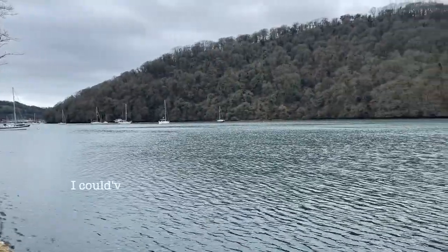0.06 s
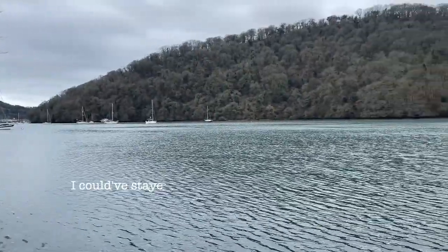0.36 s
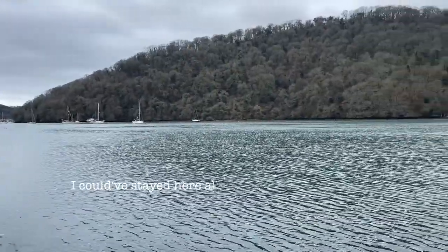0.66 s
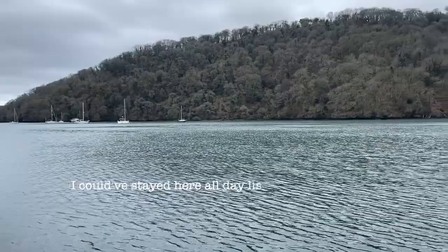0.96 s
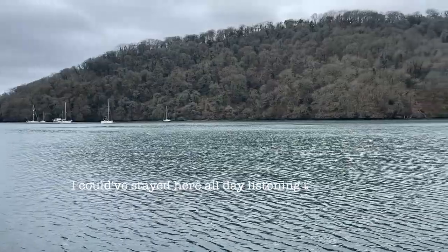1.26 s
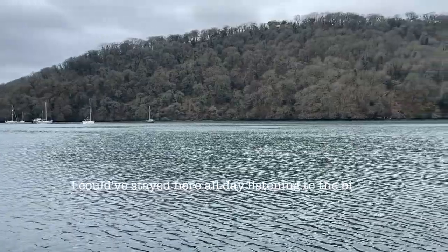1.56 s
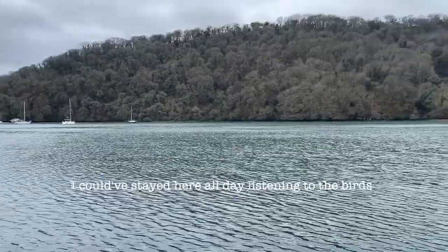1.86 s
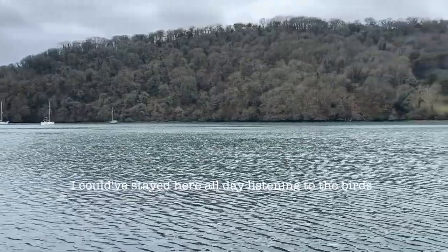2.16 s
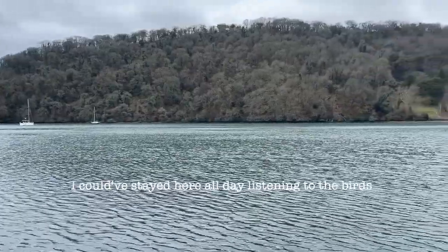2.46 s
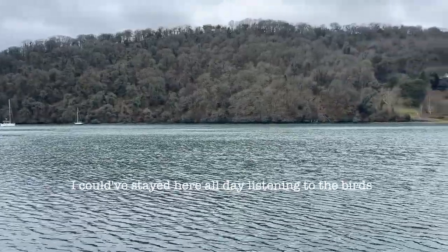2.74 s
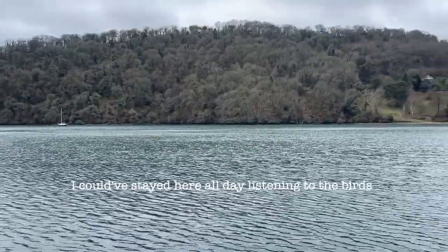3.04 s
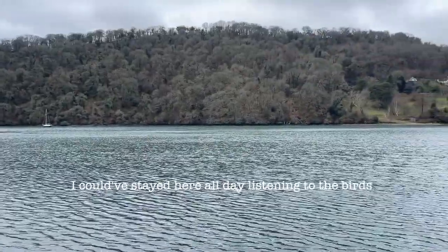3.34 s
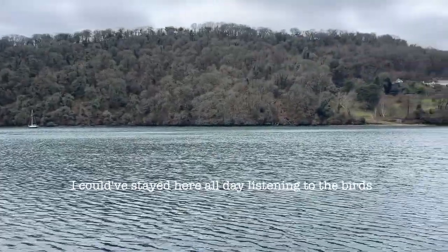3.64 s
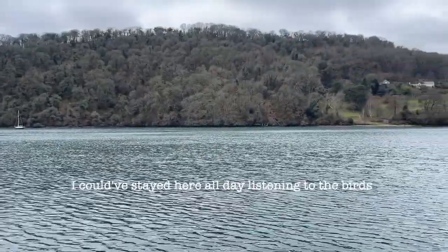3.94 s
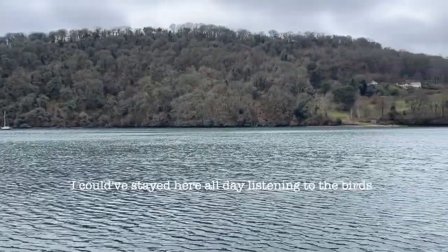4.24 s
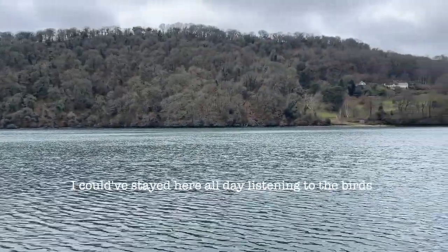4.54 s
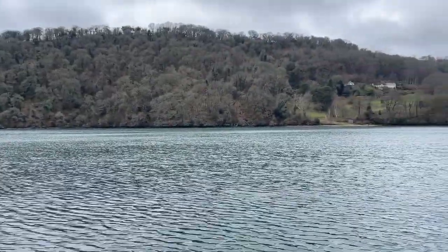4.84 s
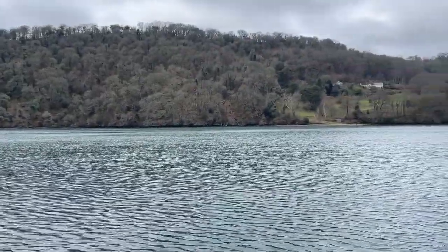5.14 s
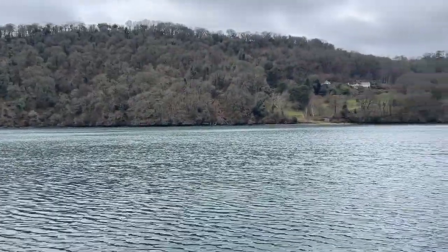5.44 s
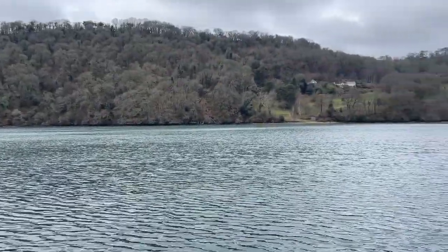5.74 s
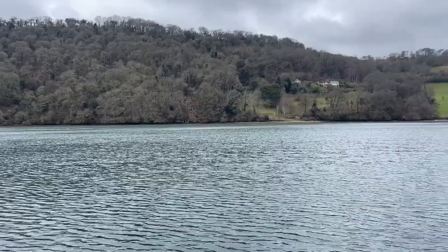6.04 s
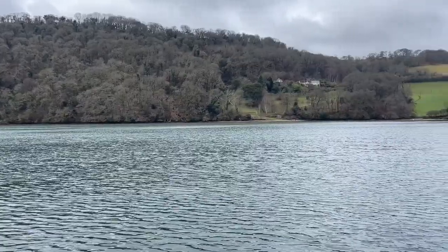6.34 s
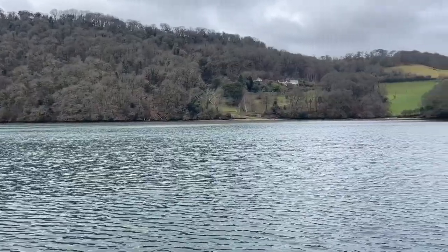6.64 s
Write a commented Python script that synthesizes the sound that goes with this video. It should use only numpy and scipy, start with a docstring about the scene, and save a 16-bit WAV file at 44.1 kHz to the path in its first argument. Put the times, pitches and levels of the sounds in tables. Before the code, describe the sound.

Outdoors on a wooded riverbank, low wind rumbles and softly thumps on the microphone over a faint hiss. From the start, a bird on the left gives a harsh trill that slows and ends in two falling notes at about 1.5 seconds. A quick warble follows around 2 seconds, then clear whistles with a quavering tail from 2.5 to 2.9. A thin, very high call runs from 3.6 to 4.6 seconds, slightly right, followed by one longer note on the left until about 5. Faint distant chirps come in between. Small ripples plop at the shore throughout, most clearly in the first second, with occasional soft washes over stones. A few faint scuffs sound nearby between 1.6 and 4.7 seconds. From about 5.7 seconds a gust brings louder rumbling and buffeting, peaking just after 6, with a faint rustle of dry leaves and tiny clicks.

```python
"""A harsh bird trill over a low breeze, on the wooded bank of a calm river. It slows and ends in two
down-slurs; a warble, plain whistles, a thin high call and one long note follow. Each voice is a gliding
tone from the syrinx, scattered by the trees. Ripples plop on the shore as tiny air pockets ring,
wavelets wash the stones and something scuffs nearby. Wind rumbles and thumps on the microphone,
gusting near the end and stirring dry leaves."""
import sys
import numpy as np
from scipy import signal
from scipy.fft import rfft, irfft, next_fast_len
from scipy.io import wavfile
from scipy.ndimage import uniform_filter1d

SR = 44100
rng = np.random.default_rng(int(sys.argv[2]) if len(sys.argv) > 2 else 0)


def digitize_waveform(pressure):
    """Quantize a signal to 16-bit integers and store it at the path in sys.argv[1].

    Rows of a 2-D input are taken as channels; values are limited to [-1, 1].
    """
    field = np.atleast_2d(pressure).T
    bounded = np.clip(field, -1, 1)
    quanta = np.round(bounded * 32767).astype(np.int16)
    wavfile.write(sys.argv[1], SR, quanta)


N = 299615

# slapback off the bank and the nearest trunks: delay_s, gain_db
NEAR_ECHOES = [(0.0134, -6.5), (0.0263, -8)]


def from_db(db):
    """Decibels to gain."""
    return 10 ** (np.asarray(db) / 20)


def rms_one(x):
    """Scale to unit power."""
    return x / np.sqrt(np.mean(x ** 2) + 1e-20)


def in_time(rows):
    """Automation: each column after time_s, read at every sample."""
    times, *columns = np.transpose(rows)
    return [np.interp(np.arange(N) / SR, times, column) for column in columns]


def at_hz(points, hz):
    """Read a curve on a log-frequency axis."""
    freqs, values = np.transpose(points)
    return np.interp(np.log(hz), np.log(freqs), values)


def filtered(x, order, hz, kind):
    """Butterworth filter."""
    return signal.sosfilt(signal.butter(order, hz, kind, fs=SR, output="sos"), x)


def drift(rate):
    """Random modulation of unit power that takes a new value rate times a second."""
    knots = rng.standard_normal(N // 4)
    return rms_one(np.interp(np.arange(N) * rate / SR, np.arange(len(knots)), knots))


def swells(rows):
    """Bell-shaped envelopes from rows of middle_s, length_s, level_db."""
    t = np.arange(N) / SR
    return sum(from_db(db) * np.exp(-np.minimum((2 * (t - s) / length) ** 2, 20))
               for s, length, db in rows)


def noise(colour, flicker_db):
    """Coloured stereo noise of unit power; each half octave has its own flicker and width."""
    # stereo image, narrow in the bass and wide above: freq_hz, left_right_correlation
    likeness = [(30, .7), (120, .8), (250, .6), (500, .05), (1500, .1), (5000, .05), (12000, -.1)]
    out, edges = 0, 22 * 2 ** np.arange(0, 9.6, .5)
    size = next_fast_len(N)
    bins = np.maximum(np.arange(size // 2 + 1) * SR / size, 1)
    white = rng.standard_normal((2, 2, size))
    coloured = irfft(rfft(white) * from_db(at_hz(colour, bins)), size)[..., :N]
    for k, (low, high) in enumerate(zip(edges, edges[1:])):
        if colour[0][0] < high and low < colour[-1][0]:
            mid, side = filtered(coloured[k % 2], 2, [low, high], "band")
            alike = at_hz(likeness, np.sqrt(low * high))
            band = np.sqrt(1 + alike) * mid + np.sqrt(1 - alike) * side * [[1], [-1]]
            out += from_db(flicker_db * drift(18)) * band
    return rms_one(out)


def tone(hz):
    """A sine of unit power that follows a pitch curve."""
    return np.sqrt(2) * np.sin(2 * np.pi * np.cumsum(hz) / SR)


def voice(hz, db, waver, waver_rate):
    """A near-pure bird tone whose pitch wavers by a small share."""
    return from_db(db) * tone(hz * (1 + waver * drift(waver_rate)))


def note(start_s, length_s, fade_s=0.015):
    """A note's own clock, held at both ends, and a gate that fades just outside them."""
    t = np.arange(N) / SR - start_s
    return np.clip(t, 0, length_s), np.clip(1 + np.minimum(t, length_s - t) / fade_s, 0, 1)


def glide(phrase, waver, waver_rate=300, fade_s=0.024):
    """One voice sliding through rows of time_s, pitch_hz, level_db."""
    hz, db = in_time(phrase)
    start, end = phrase[0][0], phrase[-1][0]
    _, gate = note(start, end - start, fade_s)
    return gate * voice(hz, db, waver, waver_rate)


def panned(x, pan_db):
    """Left louder than right by pan_db."""
    return x * from_db(np.array([[pan_db], [-pan_db]]) / 2)


def perched(x, pan_db):
    """A bird to one side is louder there, and reaches that side a little sooner."""
    lead_s = pan_db * 9e-6 * np.array([[.5], [-.5]])
    hz = np.arange(N // 2 + 1) * SR / N
    return panned(irfft(rfft(x) * np.exp(2j * np.pi * hz * lead_s), N), pan_db)


def echoed(x, echoes):
    """A sound plus its distinct reflections."""
    n = np.arange(N)
    return x + sum(from_db(db) * np.interp(n - round(s * SR), n, x, left=0) for s, db in echoes)


def trees(x, wet_db, t60, tail_db, tail_t60=1.43):
    """Trunks throw different small echoes to each side; the hillside adds a faint long tail."""
    t = np.arange(SR) / SR
    trunks = rng.standard_normal((2, SR)) * (rng.random((2, SR)) < 2500 / SR)
    echoes = trunks * (from_db(-60 * t / t60) + from_db(tail_db - 60 * t / tail_t60))
    echoes /= np.sqrt(np.sum(echoes ** 2, axis=1, keepdims=True))
    wet = from_db(wet_db)
    return (x + wet * signal.fftconvolve(x[None], echoes, axes=1)[:, :N]) / np.hypot(1, wet)


def air(level_db=-63):
    """Far woods and water blend into a faint bed of hiss."""
    # EQ of the bed: freq_hz, gain_db
    colour = [(300, 12), (800, 7), (1500, 2), (2500, -4), (4000, -6.5), (5000, -11), (6700, -7),
              (7600, -17.5), (8600, -29.5), (10000, -15.5), (12500, -20.5), (14500, -43)]
    return from_db(level_db) * noise(colour, flicker_db=3)


def wind_rumble(levelling_s=0.082, gustiness_db=0.5):
    """Turbulence on the microphone makes a deep, uneven rumble."""
    # wind strength: time_s, level_db
    strength = [(0, -52), (.33, -57), (1.2, -44), (2.25, -49.5), (2.7, -44.5), (3.25, -42.5), (3.85, -48.5),
                (4.27, -49), (4.9, -44), (5.2, -45.5), (5.58, -49.5), (5.95, -34.5), (6.16, -30),
                (6.35, -38), (6.79, -43)]
    # EQ of the rumble: freq_hz, gain_db
    colour = [(22, -39), (32, -24.5), (43, 1), (65, 1), (85, -1.5), (141, -11.5), (232, -35), (320, -45.5)]
    (wind_db,) = in_time(strength)
    eddies = noise(colour, flicker_db=3)
    eddies /= np.sqrt(uniform_filter1d(np.mean(eddies ** 2, axis=0), int(levelling_s * SR)))
    return from_db(wind_db + gustiness_db * drift(16)) * eddies


def wind_rush():
    """Moving air makes a soft low rush with brief puffs."""
    # ebb and flow: time_s, level_db
    flow = [(0, -57.5), (.8, -49.5), (1.3, -56.5), (1.43, -47), (1.9, -54.5), (2.55, -49), (2.9, -56.5),
            (3.45, -51), (3.7, -59), (3.95, -51), (4.55, -53.5), (5.45, -57), (5.9, -52), (6.79, -55)]
    # puffs of air: middle_s, length_s, level_db
    puffs = [(2.072, 0.091, -53), (2.5, 0.13, -46.5), (4.498, 0.12, -52), (6.05, 0.028, -45),
             (6.293, 0.03, -54), (6.585, 0.057, -50.5)]
    # EQ of the rush: freq_hz, gain_db
    colour = [(90, -13.5), (150, 3.5), (260, -1.5), (400, -11), (600, -21.5), (1000, -47), (2000, -30)]
    (flow_db,) = in_time(flow)
    return np.hypot(from_db(flow_db), swells(puffs)) * noise(colour, flicker_db=3.5)


def leaves():
    """Dry leaves rustle, barely there until the gust stirs them."""
    # rustle envelope: time_s, level_db
    stirring = [(0, -73), (5.6, -100), (5.8, -60), (5.95, -56), (6.08, -69), (6.25, -56), (6.45, -70),
                (6.6, -65.5), (6.79, -59.5)]
    # EQ of the rustle: freq_hz, gain_db
    colour = [(400, 10), (800, 2.5), (1500, 2), (2150, 3.5), (2700, -5), (4200, 1), (5200, -13.5),
              (6800, -7.5), (8500, -23), (12500, -18.5), (14500, -35.5)]
    (rustle_db,) = in_time(stirring)
    return from_db(rustle_db + 2 * drift(60)) * noise(colour, flicker_db=5.5)


def ripples(ring_cycles=4.6, small_per_s=12, small_db=-64):
    """Each plop is a tiny air pocket ringing for a few cycles; smaller ones come at random."""
    # plops on the shore: start_s, peak_db, pitch_hz, pan_db
    plops = [(.119, -50, 1180, 2), (.168, -49, 2700, -4), (.472, -48.5, 1490, -11), (.498, -50, 1130, 0),
             (.574, -52, 1590, -4.5), (.5995, -36, 1670, -8), (.771, -39, 1360, -7), (.865, -45, 1390, -11),
             (1.29, -46, 1887, -9), (2.291, -50, 1090, .5), (2.916, -57, 1300, 1.5),
             (2.929, -51.5, 1390, -2), (3.021, -44.5, 1480, -5), (3.388, -70, 1100, -5),
             (3.443, -50, 855, -4), (4.083, -51, 915, -2.5), (4.1, -49, 1320, -5), (4.202, -47.5, 890, -3),
             (4.887, -51, 650, -7), (5.195, -41.5, 2040, 3), (5.986, -50, 1020, 6),
             (6.182, -48.5, 1720, -16), (6.474, -51.5, 850, -9), (6.698, -64, 1120, -2)]
    out, t = np.zeros((2, N + SR)), np.arange(SR // 20) / SR
    small = [(when * N / SR, small_db + 10 * loudness, 600 * 4 ** height, 0)
             for when, loudness, height in rng.random((int(small_per_s * N / SR), 3))]
    for s, db, hz, pan_db in list(plops) + small:
        cycles = hz * t
        attack = 1 - np.exp(-cycles ** 2 / 2)
        pocket = np.sin(2 * np.pi * cycles) * attack * from_db(-60 * cycles / ring_cycles)
        at = int(s * SR)
        out[:, at:at + len(t)] += panned(from_db(db) * pocket / np.abs(pocket).max(), pan_db)
    return out[:, :N]


def trill(pitch_hz=3998, climb_hz_per_s=300, duty=.51, lift=.19, buzz_hz=430, upper_hz=5200):
    """Both sides of the syrinx sing: the strong one climbs to a buzzing crest, a weak one falls."""
    # harsh notes, slowing as they go: middle_s, relative_db
    notes = [(.148, -48.5), (0.189, -50), (0.234, -49), (0.281, -50), (0.329, -49), (.384, -46.5),
             (0.434, -47.5), (0.495, -48), (0.563, -45.5), (.647, -45), (0.726, -45.5), (.814, -44),
             (.903, -46), (.999, -45), (1.094, -44), (1.192, -42.5), (1.286, -45), (1.379, -44),
             (1.475, -43.5)]
    # grit on each crest: multiple_of_half_pitch, gain_db
    partials = [(1, -9.5), (3, -16.5)]
    middles, levels = np.transpose(notes)
    lengths = duty * np.gradient(middles)
    stray = 1 + .025 * rng.uniform(-0.92, 1, len(middles))
    pitches = (pitch_hz + climb_hz_per_s * (middles - middles[0])) * stray
    t = np.arange(N) / SR
    nearest = np.searchsorted((middles[1:] + middles[:-1]) / 2, t)
    progress = np.clip((t - middles[nearest]) / lengths[nearest], -1, 1)
    crest = swells((s, .03, 0) for s in middles)
    body = swells(zip(middles - lengths / 10, lengths, levels))
    effort = body * (from_db(-5) + from_db(-13) * crest)
    buzz = np.sin(2 * np.pi * np.cumsum(buzz_hz * (1 + 0.168 * drift(150))) / SR)
    rasp = .04 * drift(1200)
    hz = pitches[nearest] * (1 + lift * np.minimum(progress, .35) + .11 * buzz + rasp)
    weak_hz = upper_hz * (1 - 0.082 * progress + 0.021 * buzz + 0.1 * drift(1000))
    # on the crest alternate cycles are unequal, adding odd multiples of half the pitch
    grit = sum(from_db(db) * tone(round(k) * hz / 2 * (1 + 0.049 * drift(800))) for k, db in partials)
    strong = tone(hz) + crest * grit
    weak = from_db(-11) * (tone(weak_hz) + crest * from_db(-5) * tone(weak_hz / 2))
    return filtered(effort * (strong + weak), 16, 6800, "low")


def triller():
    """A bird on the left trills over the water and signs off with two whistled down-slurs."""
    # the trill mirrored by the river: delay_s, gain_db
    water_echo = [(.002315, -11)]
    # the two down-slurs: time_s, pitch_hz, relative_db
    first_slur = [(1.355, 5600, -57), (1.378, 4900, -55), (1.388, 4180, -43.5), (1.415, 3450, -53),
                  (1.445, 3040, -54.5)]
    last_slur = [(1.478, 5180, -69), (1.489, 4070, -48), (1.503, 3270, -47), (1.52, 2570, -56.5)]
    song = echoed(trill(), water_echo)
    slurs = glide(first_slur, waver=0.023, waver_rate=510)
    slurs += glide(last_slur, waver=0.022, waver_rate=910)
    song += from_db(1.5) * echoed(slurs, NEAR_ECHOES)
    return perched(trees(song, wet_db=5, t60=.11, tail_db=-11, tail_t60=.62), pan_db=4.5)


def buffets(unsteady=0.17, spread_rad=0.7, sink=0.303):
    """Each eddy shoves the microphone: a thump that sinks in pitch, its phase different on each side."""
    # wind thumps: middle_s, length_s, pitch_hz, level_db
    thumps = [(0.433, 0.022, 89.7, -36), (0.484, 0.026, 104.7, -35.5), (1.033, .025, 63, -37.5),
              (1.261, 0.046, 79.6, -34.5), (1.617, 0.039, 74.8, -26), (1.675, 0.044, 60, -31),
              (2.076, 0.038, 74, -36), (2.408, 0.027, 62, -26.5), (2.485, 0.022, 80.8, -28.5),
              (2.557, 0.024, 143.6, -38), (2.791, 0.029, 67, -25.5), (2.898, 0.025, 53.7, -23.5),
              (2.967, 0.019, 76, -32.5), (3.082, 0.082, 50.1, -30.5), (4.407, 0.047, 103.5, -34.5),
              (4.5, 0.03, 82.5, -30.5), (4.974, 0.016, 71, -30.5), (5.05, 0.03, 70.8, -30),
              (5.695, 0.015, 67.7, -27.5), (5.746, 0.02, 64.3, -28.5), (5.811, 0.078, 73.14, -28),
              (5.883, 0.022, 71.8, -16), (5.924, 0.0318, 74.2, -21), (5.964, 0.023, 68, -24),
              (6.053, .02, 88.5, -21), (6.144, 0.024, 71.9, -23), (6.204, 0.028, 67.5, -25),
              (6.286, 0.021, 142.3, -23.5), (6.301, .022, 70, -21), (6.373, 0.018, 65, -21.5),
              (6.439, 0.024, 65.5, -22), (6.531, 0.033, 76.3, -30), (6.587, 0.025, 71, -23)]
    out, t = np.zeros((2, N)), np.arange(N) / SR
    churn = 1 + unsteady * drift(120)
    for s, length, hz, db in thumps:
        turn, skew = rng.random(2)
        near = np.abs(t - s) < 2 * length
        age = (t[near] - s) / length
        cycles = np.cumsum(hz * churn[near] * np.exp(-sink * age)) / SR
        phase = 2 * np.pi * (cycles + turn) + spread_rad * (2 * skew - 1) * np.array([[1], [-1]])
        out[:, near] += from_db(db) * np.exp(-(2 * age) ** 2) * np.sin(phase)
    return filtered(out, 2, 32, "high")


def ticks(t60=0.076, trim_db=-6):
    """Tiny dry clicks close to the microphone."""
    # bright noise bursts: start_s, relative_db
    clicks = [(.775, -57), (4.515, -70), (6.208, -54), (6.26, -45.5), (6.30, -56), (6.334, -58)]
    t = np.arange(N) / SR
    decay = sum((t >= s) * from_db(db - 60 * np.clip(t - s, 0, 2 * t60) / t60) for s, db in clicks)
    return from_db(trim_db) * filtered(decay * rng.standard_normal((2, N)), 2, 8000, "high")


def far_calls(arch=0.02, edge_db=2):
    """Short arched glides, blurred by the depth of the wood."""
    # distant birds: start_s, length_s, start_hz, end_hz, level_db
    chips = [(0.84, 0.087, 715, 741, -62), (1.643, 0.12, 3554, 2900, -56), (2.474, 0.029, 2240, 2250, -58),
             (2.613, 0.026, 3007, 2840, -46), (3.177, 0.0082, 3170, 3650, -60),
             (3.237, 0.0058, 3040, 3300, -57), (3.316, 0.024, 2810, 3180, -67.5),
             (3.422, 0.15, 1310, 1371, -69), (3.774, 0.05, 2610, 2620, -64),
             (3.777, 0.015, 1552, 1525, -60), (3.875, 0.057, 1556, 1457, -69),
             (4.092, 0.074, 3545, 3600, -65), (4.257, 0.071, 3370, 3210, -67),
             (4.352, 0.054, 3450, 3445, -63.5), (4.472, 0.064, 3475, 3450, -71.5),
             (5.022, .03, 3740, 3550, -65), (5.066, .12, 3523, 3575, -64), (5.115, 0.097, 3075, 3280, -68),
             (5.39, 0.041, 2560, 2530, -67), (5.67, .02, 4020, 3830, -71),
             (5.692, 0.043, 3000, 2810, -66.5), (5.74, .14, 508, 522, -61.5),
             (5.895, 0.047, 4350, 4420, -86)]
    out = 0
    for s, length, start_hz, end_hz, db in chips:
        middle_hz = (start_hz + end_hz) / 2 * (1 + min(arch, abs(end_hz / start_hz - 1)))
        out += glide([(s, start_hz, db - edge_db), (s + length / 2, middle_hz, db),
                      (s + length, end_hz, db - edge_db)], waver=0.012)
    return trees(out, wet_db=4, t60=0.42, tail_db=-14)


def pips():
    """One small bird repeats a high arched pip from a near branch."""
    # repeats: start_s, level_db
    cues = [(1.531, -66), (1.821, -60.5), (2.3, -64.5), (3.013, -64.5), (5.0, -76)]
    # contour of one pip: offset_s, pitch_hz, gain_db
    shape = [(0, 5880, -8.5), (0.02, 6060, -13.5), (0.038, 5780, 0.5), (.053, 5390, -12)]
    phrases = [[(s + offset, hz, db + gain) for offset, hz, gain in shape] for s, db in cues]
    out = sum(glide(phrase, waver=0.008, fade_s=.008) for phrase in phrases)
    return trees(out, wet_db=-3.5, t60=0.12, tail_db=-41)


def scuffs(attack_s=0.0045):
    """Something brushes the ground nearby: a quick bite, then the friction dies away."""
    # soft strokes: start_s, decay_s, level_db
    strokes = [(1.635, 0.083, -52), (2.193, 0.087, -63), (2.47, 0.098, -61), (3.218, 0.075, -54),
               (4.124, 0.085, -64.5), (4.642, 0.09, -61.5)]
    # EQ of the friction: freq_hz, gain_db
    colour = [(300, 4), (900, -16), (1400, 3.5), (2200, 11.5), (4200, -1.5), (6800, -2.5), (8500, -19.5),
              (13000, -31)]
    push, t = 0, np.arange(N) / SR
    for s, decay_s, db in strokes:
        bite = np.clip((t - s) / attack_s, 0, 1)
        push += bite * swells([(s, 2 * decay_s, db)])
    return push * noise(colour, flicker_db=-5.5)


def warbler(scoop=0.28, scoop_s=0.00713, soft_start_db=14, fade_db=3, flutter_hz=115):
    """Each syllable flicks up from below, flutters over its top and fades as it comes down."""
    # arched syllables: start_s, length_s, top_hz, fall_hz, relative_db
    syllables = [(1.907, 0.035, 3620, 404, -37), (1.934, 0.041, 3658, 200, -39.5),
                 (1.969, .032, 3200, 119, -44.5), (2.01, 0.031, 3220, 101, -37),
                 (2.039, 0.046, 3460, 507, -45.5), (2.102, 0.054, 3530, 593, -44),
                 (2.175, .085, 3425, 448, -45), (2.254, 0.054, 3144, 100, -48),
                 (2.276, 0.035, 3670, 60, -57.5)]
    out = 0
    for start, length, top_hz, fall_hz, db in syllables:
        t, gate = note(start, length, fade_s=0.005)
        onset, ending = np.exp(-t / scoop_s), (t / length) ** 2.83
        flutter = 0.03 * np.sin(2 * np.pi * flutter_hz * t)
        hz = top_hz * (1 - scoop * onset + flutter) - fall_hz * ending
        level_db = db - soft_start_db * onset - fade_db * ending
        out += gate * voice(hz, level_db, waver=0.01265, waver_rate=300)
    scattered = trees(echoed(out, NEAR_ECHOES), wet_db=-4, t60=0.25, tail_db=-27)
    return from_db(-2.5) * perched(scattered, pan_db=1)


def whistler(scoop=0.19, scoop_s=0.0118, sag_hz_per_s=500, soft_start_db=20):
    """Whistles scoop up to pitch, swelling as they arrive, and sag; the last breaks into a quaver."""
    # held whistles: start_s, length_s, pitch_hz, level_db
    whistles = [(2.469, 0.077, 3627, -50), (2.522, .105, 3181, -36.5)]
    out = 0
    for start, length, pitch_hz, db in whistles:
        t, gate = note(start, length)
        onset = np.exp(-t / scoop_s)
        hz = pitch_hz * (1 - scoop * onset) - sag_hz_per_s * (t - length / 2)
        out += gate * voice(hz, db - soft_start_db * onset, waver=0.006, waver_rate=700)
    return perched(trees(out + quaver(), wet_db=-1, t60=0.16, tail_db=-33), pan_db=6.5)


def wavelets():
    """Small waves wash over the stones in soft swells of noise."""
    # washes: middle_s, length_s, level_db
    washes = [(2.55, 0.19, -53.5), (4.15, 0.26, -64), (4.9, 0.059, -53.5), (6.72, 0.6, -58)]
    # EQ of the wash: freq_hz, gain_db
    colour = [(300, -1.5), (450, 1.5), (650, 6.5), (1000, -14.5), (1800, -16), (3000, -22.5)]
    return swells(washes) * noise(colour, flicker_db=5.5)


def quaver(pitch_hz=3150, level_db=-44, pulses_per_s=28.5, dip=.06, dip_db=10, fade_db_per_s=20):
    """The whistle's softer, pulsing tail: pitch and level dip together between pulses."""
    t, gate = note(start_s=2.64, length_s=0.25)
    slack = (1 + np.cos(2 * np.pi * pulses_per_s * t)) / 2
    hz = pitch_hz * (1 - dip * slack ** 2)
    return gate * voice(hz, level_db - dip_db * slack - fade_db_per_s * t, waver=0.026, waver_rate=630)


def thin_caller(bend=1.8, taper_db=12, peak_at=0.38):
    """High slurs drop fast and level off; the wider the slide, the raspier the note."""
    # chain of down-slurs: start_s, length_s, start_hz, end_hz, level_db
    slurs = [(3.561, 0.08, 7320, 6800, -67), (3.62, 0.11, 6700, 6050, -62.5),
             (3.739, 0.1, 6960, 6550, -61.5), (3.779, 0.1, 6450, 6170, -61.5),
             (3.915, 0.09, 7300, 6800, -65), (3.973, 0.079, 6670, 6520, -55),
             (4.056, 0.15, 7000, 6600, -64), (4.131, 0.092, 6400, 6150, -66),
             (4.223, 0.078, 6820, 6550, -59), (4.327, 0.18, 6660, 6490, -58.5),
             (4.51, 0.062, 6600, 6500, -55), (4.571, 0.064, 6570, 6430, -65.5)]
    out = 0
    for start, length, high_hz, low_hz, db in slurs:
        t, gate = note(start, length)
        progress = t / length
        hz = low_hz + (high_hz - low_hz) * np.abs(1 - progress) ** bend
        rasp = .004 + 0.21 * (1 - low_hz / high_hz)
        out += gate * voice(hz, db - taper_db * np.abs(progress - peak_at), waver=rasp, waver_rate=360)
    return perched(trees(out, wet_db=6, t60=0.7, tail_db=-25), pan_db=-3)


def long_whistler(pitch_hz=4335, scoop_s=0.009, creep_s=0.033, settle_s=0.2, fade_db_per_s=16):
    """A farther bird flicks up, swells on to one long note, grows purer and leans on the end."""
    t, gate = note(start_s=4.664, length_s=.265)
    scoop, creep = np.exp(-t / scoop_s), np.exp(-t / creep_s)
    accent = swells([(4.912, .04, 8)])
    hz = pitch_hz * (1 - 0.25 * scoop - 0.093 * creep)
    db = -54.5 - 11 * creep - fade_db_per_s * t
    rasp = 0.0042 + 0.0267 * np.exp(-t / settle_s)
    call = gate * (1.5 + accent) * voice(hz, db, waver=rasp, waver_rate=1300)
    return perched(trees(call, wet_db=3, t60=0.52, tail_db=-20), pan_db=7.5)


def scene():
    """Birds, shore and weather together."""
    birds = triller() + warbler() + whistler() + thin_caller() + long_whistler() + far_calls() + pips()
    shore = ripples() + wavelets()
    nearby = ticks() + scuffs()
    bed = air()
    breeze = wind_rumble() + wind_rush() + leaves() + buffets()
    return birds + shore + nearby + bed + breeze


def record(dry):
    """A steep high cut, 70 dB down from 15.5 kHz."""
    return signal.sosfilt(signal.cheby2(12, 70, 15500, fs=SR, output="sos"), dry)


dry = scene()
out = record(dry)
digitize_waveform(out)
```